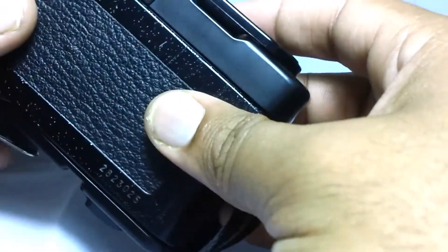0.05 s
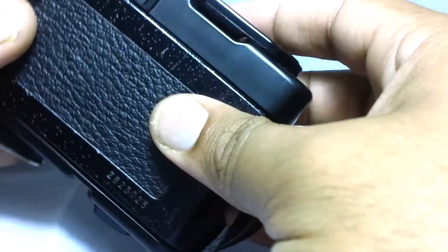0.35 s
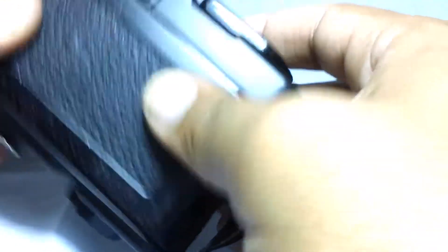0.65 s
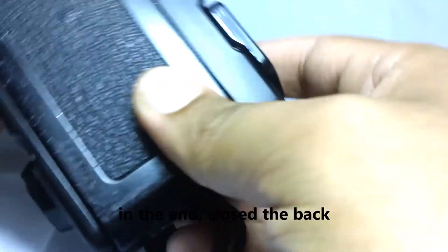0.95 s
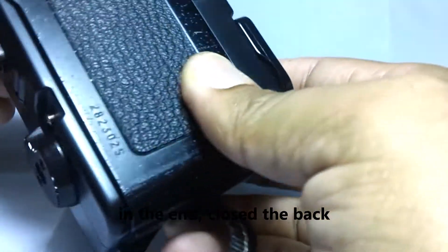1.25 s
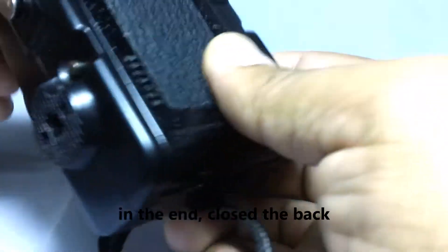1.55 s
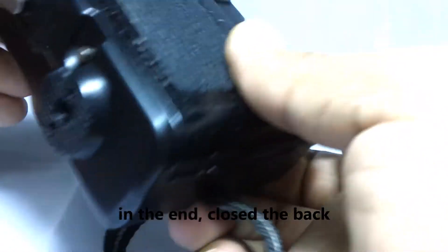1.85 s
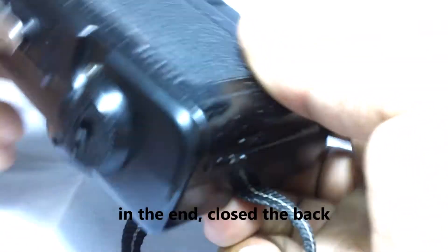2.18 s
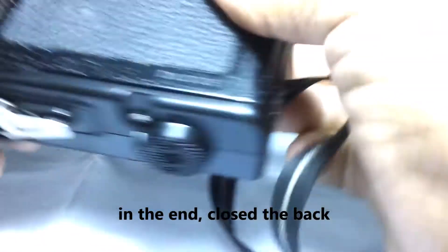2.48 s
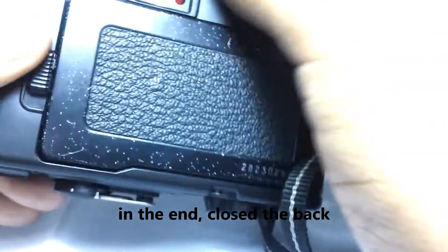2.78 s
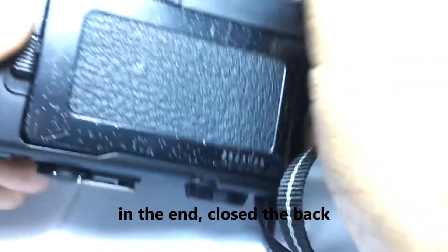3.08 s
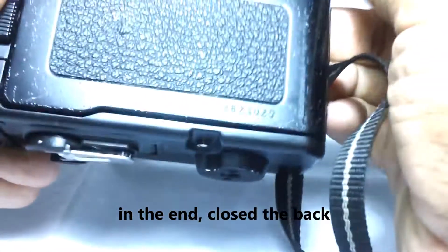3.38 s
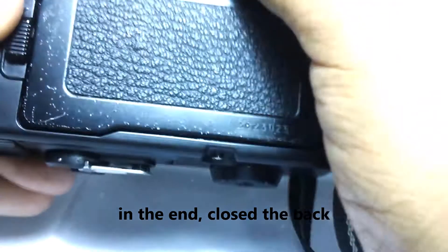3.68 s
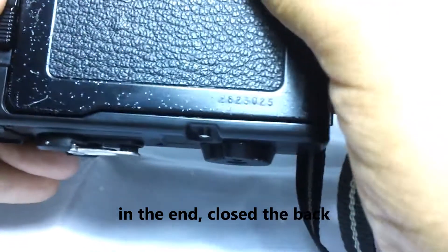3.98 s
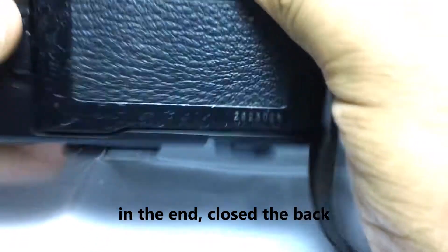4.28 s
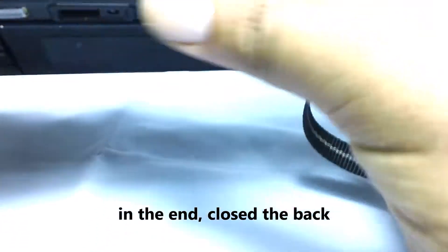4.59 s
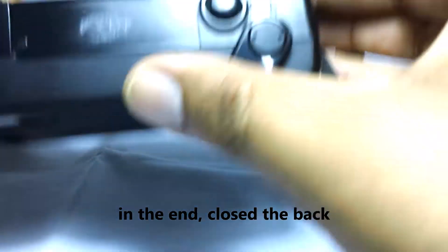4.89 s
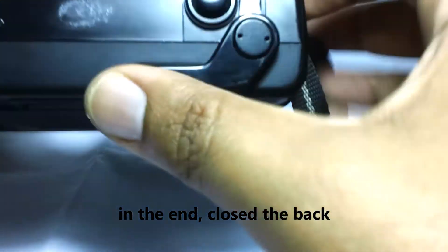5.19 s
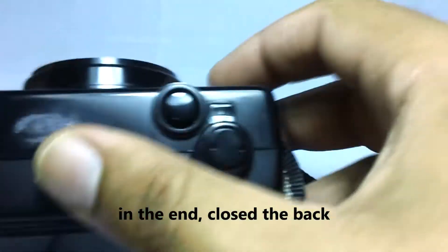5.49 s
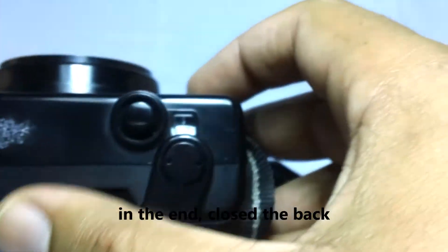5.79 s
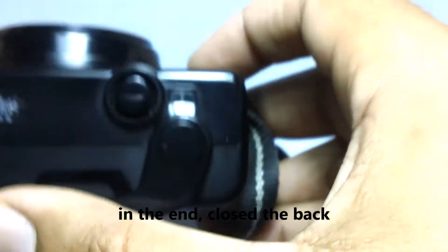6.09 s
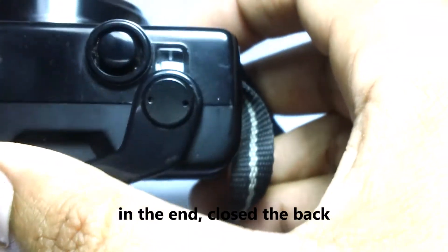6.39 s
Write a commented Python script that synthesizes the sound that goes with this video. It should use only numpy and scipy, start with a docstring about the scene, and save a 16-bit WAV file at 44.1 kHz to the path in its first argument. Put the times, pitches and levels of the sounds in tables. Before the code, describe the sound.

A compact plastic film camera is handled close to the microphone in a small quiet room, each contact a bright tick with a short hollow knock. Finger knocks and a click at 0.3 to 0.4 seconds lead to the back clapping shut loudly at 0.5, with more catch clicks around 0.7. Light ticks come at 1.5, 1.8 and 2.4. At 3.0 a sharp snap starts a fast thumbwheel ratchet with slight rubbing, lasting until 3.3. A flurry of clicks follows from 3.5 to 3.7. A very sharp snap at 4.1 leaves a faint spring ring, then a hollow knock lands at 4.3. Softer finger taps cluster between 5.0 and 5.3, and one tiny tick comes at 6.3. Underneath, faint rumble, fan hum and hiss dip at the loud clicks and swell back. The sound is almost mono, with slight room echo.

```python
"""A compact plastic film camera clicks and knocks as it is handled close by in a small quiet room.
Each contact makes the stiff shell tick and the hollow body ring. Catches snap home, the back slams
shut, springs ring on, a thumbwheel ratchets and fingers tap and slide over the case.
Behind it a low rumble, a fan's hum and a soft hiss dip together now and then and swell back."""
import sys
import numpy as np
from scipy import signal
from scipy.fft import rfft, irfft, next_fast_len
from scipy.io import wavfile

SR = 44100
rng = np.random.default_rng(int(sys.argv[2]) if len(sys.argv) > 2 else 0)


def int16_out(signal):
    """Quantize to a 16-bit WAV file."""
    q = np.round(np.clip(np.atleast_2d(signal).T, -1, 1) * 32767)
    wavfile.write(sys.argv[1], SR, q.astype(np.int16))


N = 293265
TIME = np.arange(N) / SR
BLOW = TIME[:SR // 8]   # time axis of one contact

# small hard parts clicking: t/s, tick level/dB, tick decay/s, knock level/dB, knock f/Hz
PART_CLICKS = [ (.412, -34.5, 0.0045, -24, 1220), (.6905, -20, 0.00096, -27, 1120),
               (1.5178, -30.5, 0.0021, -32, 910), (1.7948, -36.5, 0.0016, -31.5, 1360),
               (1.81, -45, 0.0046, -35, 1880), (2.333, -44, 0.0048, -50.5, 1500),
               (2.4157, -38, 0.0023, -44, 1290), (3.1348, -23, 0.00097, -38, 1300),
               (3.1747, -23, 0.00068, -31, 1300), (3.196, -26, 0.0029, -27, 1910),
               (3.541, -39, 0.0017, -47, 1600), (3.568, -18.5, 0.00089, -29, 1620),
               (3.594, -15.5, 0.00094, -26, 1540), (3.612, -28, 0.0016, -30, 1400),
               (3.632, -19.5, 0.00096, -32, 1570), (3.6489, -21.5, .004, -17.5, 1470),
               (4.094, -35, .0012, -34.5, 1600), (4.1064, -32, 0.0014, -51, 1700),
               (4.1206, -21, 0.0024, -24.5, 1270), (4.311, -44, 0.0017, -41, 1700),
               (4.3439, -30.5, 0.00094, -19, 1145), (6.29, -48.5, 0.0017, -60, 1700)]
# dull knocks of fingers on the case: t/s, level/dB, f/Hz
FINGER_KNOCKS = [ (0.3382, -32.5, 880), (.375, -32, 750), (.389, -23, 760), (0.7127, -32.5, 1400),
                 (.725, -34.5, 750), (2.425, -38, 200), (3.028, -27, 1880), (3.0548, -19.5, 730),
                 (3.3, -21.5, 1160), (4.398, -32.5, 1220), (5.0614, -34.5, 1180), (5.198, -34.5, 150),
                 (5.2213, -25.5, 1210), (5.244, -26.5, 590), (5.245, -27, 150), (5.263, -29.5, 150),
                 (5.28, -32.5, 200)]
# tones of the hollow body: f/Hz, level/dB, time to fade by 60 dB/s
BODY_TONES = [(161.3, -3, 0.04), (335, -9, 0.045), (498, 3.5, 0.02), (696, 4.5, 0.028), (826, 5, 0.012),
              (1156, 11.5, 0.0086), (1304, -2.5, 0.043), (1513, 2.5, 0.027), (1670, 6.5, 0.022),
              (2195, -3.5, 0.051), (2460, 8.5, 0.015)]
def camera(finger_tick_db=-22.5, finger_decay_s=0.0022):
    """Every contact makes a bright tick in the shell and a hollow knock in the body."""
    force, body = rubbing(), np.zeros(N)
    fingers = [(s, db + finger_tick_db, finger_decay_s, db, hz) for s, db, hz in FINGER_KNOCKS]
    for s, tick_db, decay_s, knock_db, hz in catches() + PART_CLICKS + fingers + ratchet():
        add(force, s, from_db(tick_db) * chatter(decay_s, hz))
        add(body, s, from_db(knock_db) * knock(BODY_TONES, hz, focus_db=22.5, t=BLOW))
    body += springs()
    back_slam = knock(BODY_TONES, centre_hz=407, focus_db=5.5, t=BLOW)   # shakes the whole body
    add(body, s=0.4912, sound=from_db(-6.5) * back_slam)
    return body + shell(force)


# catches snapping home: t/s, tick level/dB, tick decay/s, knock level/dB, knock f/Hz,
# first touch ahead by/s, first touch level against the snap/dB
CATCH_SNAPS = [ (.404, -24, .0012, -18.5, 865, 0.0068, -7), (.4925, -13, 0.00092, -9, 1080, 0.0014, -6.5),
               (.6651, -15, 0.0019, -17, 1420, 0.0054, -12.5), (3.0409, -13, 0.0013, -27, 1650, 0.014, -22),
               (3.507, -21.5, 0.002, -22.5, 1650, .0132, -14.5),
               (4.1277, -3.5, 0.00067, -14.5, 1570, .011, -16)]
def catches(touch_decay_s=0.0032, rebound_s=0.0069, rebound_db=-20.5, rebound_decay_s=0.0033):
    """List the contacts as each catch rides over its edge, snaps home and bounces once."""
    contacts = []
    for s, tick_db, decay_s, knock_db, hz, lead_s, touch_db in CATCH_SNAPS:
        touch = (-lead_s, touch_db, touch_decay_s)
        snap = (0, 0, decay_s)
        rebound = (rebound_s, rebound_db, rebound_decay_s)
        for delay_s, db, length_s in (touch, snap, rebound):
            spread_db = 10 * np.log10(length_s / decay_s)   # a longer contact spreads its energy
            contacts.append((s + delay_s, tick_db + db - spread_db, length_s, knock_db + db, hz))
    return contacts


# the thumb pushes the wheel harder, then eases off: t/s, tooth tick level/dB
THUMB_PUSH = [(3.07, -30.5), (3.25, -21), (3.3, -27.5)]
def ratchet(start_s=3.069, teeth=20, first_gap_s=0.0142, decay_s=0.00091, knock_db=-6, tooth_hz=1065):
    """List the contacts as a small lever drops over each thumbwheel tooth, then touches again softly."""
    contacts, s = [], start_s
    for tooth in range(teeth):
        gap_s = first_gap_s * 0.98 ** tooth   # the teeth pass ever faster
        for delay_s, loss_db in ((0, 0), (0.49 * gap_s, 5.5)):
            late, strong, high = rng.standard_normal(size=3)   # no two contacts are alike
            db = np.interp(s, *np.transpose(THUMB_PUSH)) - loss_db + 2.5 * strong
            hz = tooth_hz * 2 ** (0.44 * high)
            contacts.append((s + delay_s + 0.0003 * late, db, decay_s, db + knock_db, hz))
        s += gap_s
    return contacts


def chatter(decay_s, centre_hz, rise_s=0.00046, rattle_db=-22, brightness=7, snap_cycles=3):
    """The force of a hard contact: a burst of tiny impacts, then a weaker, longer rattle of loose parts."""
    envelope = np.exp(-BLOW / decay_s) + from_db(rattle_db) * np.exp(-BLOW / (4 * decay_s))
    envelope *= 1 - np.exp(-BLOW / rise_s)
    # make all frequencies equally strong, so the burst has no pitch of its own
    size = next_fast_len(2 * len(BLOW))
    spectrum = rfft(envelope * rng.choice([-1, 1], len(BLOW)), size)
    burst = irfft(spectrum / (np.abs(spectrum) + 1e-9), size)[:len(BLOW)]
    # a contact that knocks low is also softer, so its tick is duller
    softness = np.exp(-2 * np.pi * brightness * centre_hz / SR)
    burst = signal.lfilter([1], [1, -softness], burst)
    # the briefer the contact, the less bass it carries
    burst = cut_bass(burst, min(snap_cycles / decay_s, SR / 4), order=1)
    return burst * np.linalg.norm(envelope) / np.linalg.norm(burst)


def knock(tones, centre_hz, focus_db, t, scatter_db=1.5, rise_s=0.00036):
    """A struck part rings. The spot hit favours tones near centre_hz, by focus_db for each octave."""
    hz, db, fade_s = np.transpose(tones)
    octaves_away = np.abs(np.log2(hz / centre_hz))
    weight = from_db(db - focus_db * octaves_away + scatter_db * rng.standard_normal(len(hz)))
    phase = 2 * np.pi * (hz[:, None] * t + rng.random((len(hz), 1)))
    rings = np.sin(phase) * from_db(-60 * t / fade_s[:, None])
    attack = 1 - np.exp(-t / rise_s)
    sound = (weight / np.linalg.norm(weight)) @ rings
    return cut_bass(sound * attack, 0.53 * centre_hz)


# pitches at which the stiff shell and latches ring: f/Hz, width/Hz, level/dB
SHELL_BANDS = [(787, 105, 11), (1426, 147, 5.5), (2113, 390, 4), (2750, 202, -3.5), (3410, 150, 2.5),
               (3970, 810, 0), (4830, 970, 0), (5450, 580, -0.5), (6310, 1090, 4.5), (7500, 980, 3),
               (8510, 650, 2), (9460, 1500, -3.5), (10370, 1800, -2.5), (10760, 620, -7.5),
               (13460, 870, 5.5), (14770, 400, -1.5)]
def shell(force):
    """The plastic shell rings briefly under any force, giving ticks and rubbing their tone."""
    ringing = sum(from_db(db) * resonance(force, hz, width) for hz, width, db in SHELL_BANDS)
    return cut_bass(ringing, hz=450)


# tones of springs and thin metal: f/Hz, level/dB, time to fade by 60 dB/s
SPRING_TONES = [(545, -8.5, 0.65), (1034, -17, 0.14), (1460, -4.5, 0.2), (1650, -7, 0.93),
                (5500, -6.5, .35), (7800, -17.5, 0.381), (8800, -1, 0.35)]
# snaps that shake the springs: t/s, ring level/dB, ring f/Hz, thump level/dB
HARD_SNAPS = [(0.494, -58, 600, -32.5), (4.129, -45, 1700, -38.5), (4.345, -54, 550, -59)]
def springs(thump_decay_s=0.00066):
    """A hard snap sets the springs ringing and jolts the case with a thump."""
    sound = np.zeros(N)
    for s, ring_db, hz, thump_db in HARD_SNAPS:
        add(sound, s, from_db(ring_db) * knock(SPRING_TONES, hz, focus_db=2.5, t=TIME[:SR]))
        add(sound, s, from_db(thump_db) * np.exp(-BLOW / thump_decay_s))
    return sound


# plastic and skin sliding: t/s, length/s, final level/dB
GRIP_SLIDES = [(2.277, 0.075, -56), (2.373, 0.051, -57.5), (3.03, 0.28, -40), (3.476, .18, -46.5),
               (4.617, 0.275, -68), (5.12, 0.28, -63)]
def rubbing(grain_db=3, release_s=0.012):
    """Sliding surfaces catch in fine uneven grains, pressing ever harder until they let go."""
    grains = rng.standard_normal(N)
    grains *= from_db(grain_db * np.repeat(rng.standard_normal(N), 32)[:N])   # 32 samples a grain
    pressure = np.zeros(N)
    for s, length_s, db in GRIP_SLIDES:
        press = np.clip((TIME - s) / length_s, 0, 1)
        release = np.exp(-np.maximum(TIME - s - length_s, 0) / release_s)
        pressure += from_db(db) * press * release
    return pressure * rms_one(grains)


# the room's echo, band by band: f/Hz, level/dB, time to fade by 60 dB/s
ECHO_BANDS = [(306, -15.5, 0.82), (662, -14, 0.26), (1395, -17.5, 0.23), (3040, -13.5, 0.38),
              (5920, -20, 0.4), (10100, -19.5, 0.42), (15020, -19.5, 0.31)]
def room(x, build_s=0.002):
    """Reflections from the walls build up quickly, then each band dies away at its own pace."""
    t = TIME[:SR // 2]
    centres = np.array(ECHO_BANDS)[:, 0]
    edges_hz = [150, *np.sqrt(centres[1:] * centres[:-1]), 18000]
    tail = 0
    for (_, db, fade_s), low, high in zip(ECHO_BANDS, edges_hz, edges_hz[1:]):
        envelope = from_db(-60 * t / fade_s) * (1 - np.exp(-(t / build_s) ** 2))
        band_filter = signal.butter(2, [low, high], "band", fs=SR, output="sos")
        band = signal.sosfilt(band_filter, rng.standard_normal(len(t)))
        tail += from_db(db) * band * envelope / np.linalg.norm(envelope)
    return signal.fftconvolve(x, tail)[:N]


# tones of the fan motor: f/Hz, relative level/dB
FAN_TONES = [(245.6, -3.5), (491, -13), (541, -16.5)]
def fan(waver_share=0.17, waver_width_hz=5):
    """The motor hums in steady tones; a little noise around each pitch makes it waver."""
    hum = np.zeros(N)
    for hz, db in FAN_TONES:
        waver = rms_one(resonance(rng.standard_normal(N), hz, waver_width_hz))
        tone = np.sin(2 * np.pi * (hz * TIME + rng.random()))
        hum += from_db(db) * rms_one(tone + waver_share * waver)
    return hum


# the room's low rumble: f/Hz, relative level/dB
RUMBLE_SHAPE = [(25, -29), (45, -15), (65, -10.5), (100, -10.5), (160, -11.5), (240, -9.5), (310, -11.5),
                (420, -11.5), (500, -16), (600, -17), (900, -21)]
# the soft hiss: f/Hz, relative level/dB
HISS_SHAPE = [(290, -19), (500, -8), (740, -7.5), (1900, -13), (2130, -13.5), (2890, -16), (9490, -24),
              (12500, -29.5), (14700, -20), (15300, -27), (16000, -54.5)]
# dips in the background, at the start and at loud clicks: t/s, level/dB
BACKGROUND_DIPS = [(0, -8.5), (.5, -9), (.67, -12), (3.045, -6), (3.65, -6.5), (4.135, -19.5)]
def background(swell_per_s=0.58, hiss_dip_share=0.81):
    """Rumble, hum and hiss drop at set times and swell back evenly; the hiss dips a little less."""
    level = np.ones(N)
    for s, db in BACKGROUND_DIPS:
        swell = from_db(db) + swell_per_s * (TIME - s)
        level = np.minimum(level, np.where(TIME < s, 1, swell))
    drone = from_db(-4) * noise(RUMBLE_SHAPE) + fan()
    hiss = noise(HISS_SHAPE)
    return from_db(-51) * level * drone + from_db(-57) * level ** hiss_dip_share * hiss


def noise(shape):
    """Steady noise that follows a list of (f/Hz, level/dB) points and falls steeply beyond its ends."""
    hz, db = np.transpose(shape)
    size = next_fast_len(N)
    f = np.maximum(np.fft.rfftfreq(size, 1 / SR), 1)
    gain = from_db(np.interp(np.log(f), np.log(hz), db))
    gain /= 1 + (hz[0] / f) ** 4 + (f / hz[-1]) ** 8
    spectrum = rfft(rng.standard_normal(size)) * gain
    return rms_one(irfft(spectrum, size)[:N])


def resonance(x, hz, width_hz):
    """Let through a band around one pitch, which rings longer the narrower it is."""
    r = np.exp(-np.pi * width_hz / SR)
    feedback = [1, -2 * r * np.cos(2 * np.pi * hz / SR), r * r]
    return signal.lfilter(np.array([1, 0, -1]) * (1 - r * r) / 2, feedback, x + 1e-18)


def cut_bass(x, hz, order=2):
    """Weaken everything below hz."""
    return signal.sosfilt(signal.butter(order, hz, "high", fs=SR, output="sos"), x)


def from_db(db):
    """Turn decibels into a gain."""
    return 10 ** (np.asarray(db) / 20)


def rms_one(x):
    """Scale to an average power of one."""
    return x / np.sqrt(np.mean(x ** 2) + 1e-20)


def add(out, s, sound):
    """Mix a sound in at s seconds."""
    start = int(round(s * SR))
    out[start:start + len(sound)] += sound[:N - start]


# faint noise that differs between left and right: f/Hz, relative level/dB
CHANNEL_NOISE = [(30, 6.5), (100, -8.5), (300, -3), (1000, -1), (3000, -3), (8000, -1.5), (14000, -11.5)]
def scene(skew_db=-33, channel_noise_db=-73):
    """Camera, echo and background, almost mono: only a tiny phase shift and faint noise part the sides."""
    direct = camera()
    mid = direct + room(direct) + background()
    quarter_cycle_shifted = signal.hilbert(mid, next_fast_len(N))[:N].imag
    side = from_db(skew_db) * quarter_cycle_shifted + from_db(channel_noise_db) * noise(CHANNEL_NOISE)
    return np.array([mid + side, mid - side])


def record(dry, ceiling=0.79, notch_hz=12650, notch_width_hz=900, cutoff_hz=15600):
    """Round off the highest peaks, take out the microphone's narrow treble notch and cut the very top."""
    sound = dry / (1 + (dry / ceiling) ** 4) ** (1 / 4)
    for _ in range(2):
        sound = sound - resonance(sound, notch_hz, notch_width_hz)
    return signal.sosfilt(signal.ellip(10, 0.3, 70, cutoff_hz, fs=SR, output="sos"), sound)


dry = scene()
out = record(dry)
int16_out(out)
```